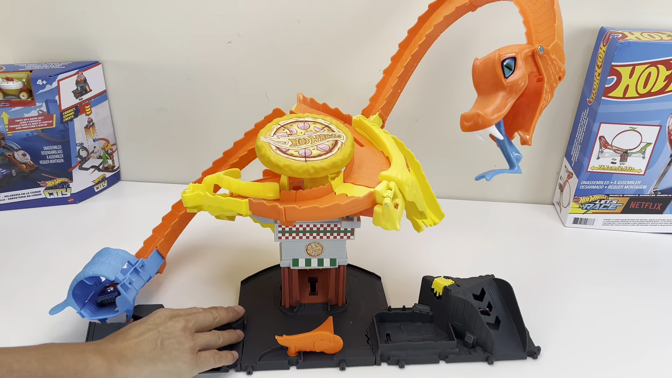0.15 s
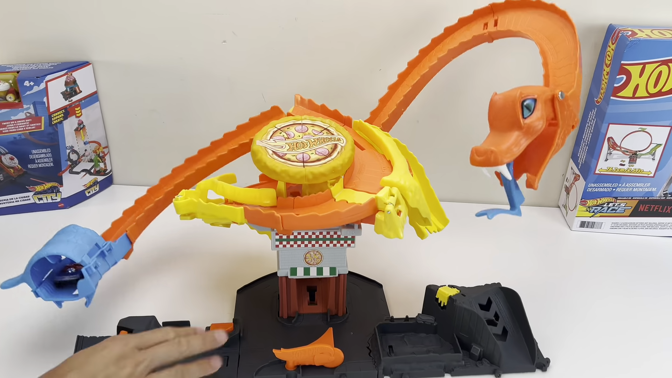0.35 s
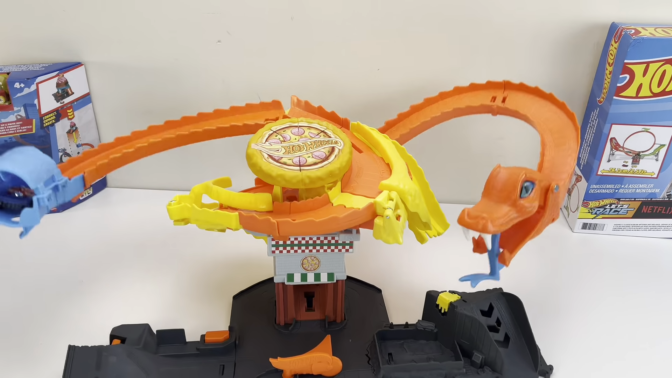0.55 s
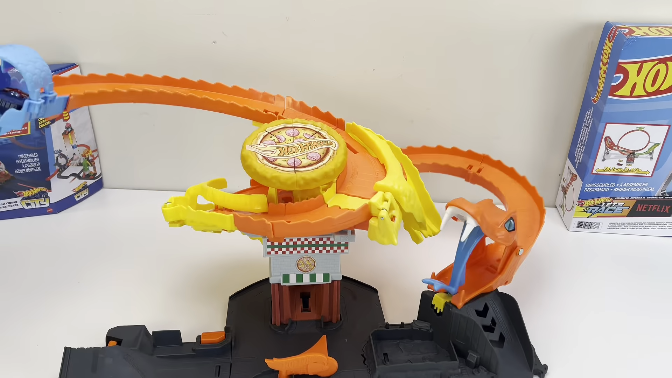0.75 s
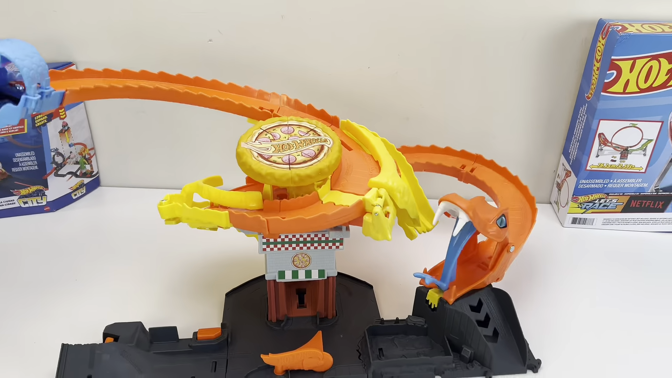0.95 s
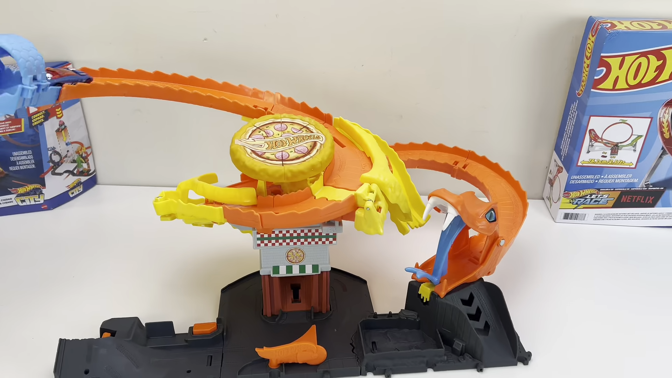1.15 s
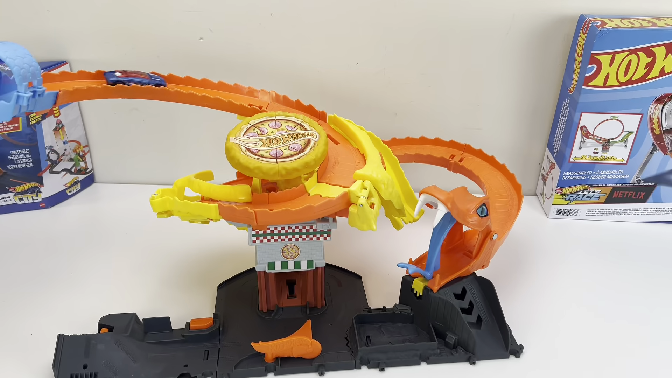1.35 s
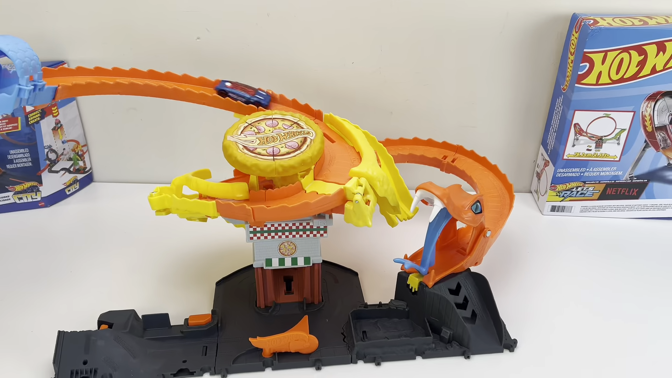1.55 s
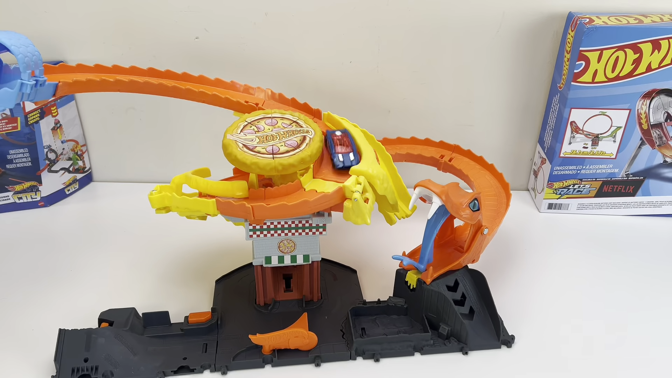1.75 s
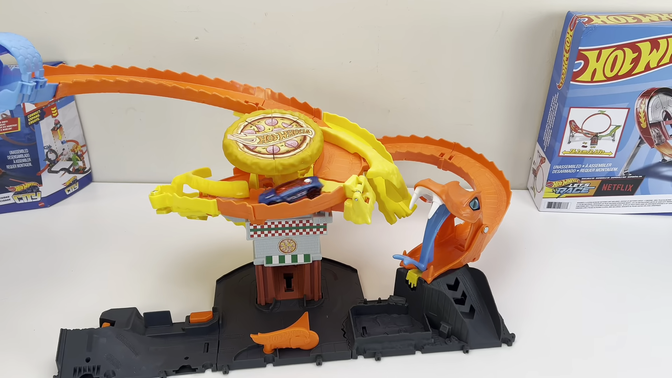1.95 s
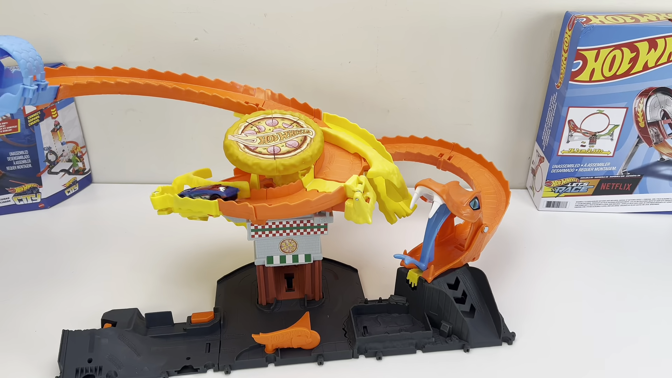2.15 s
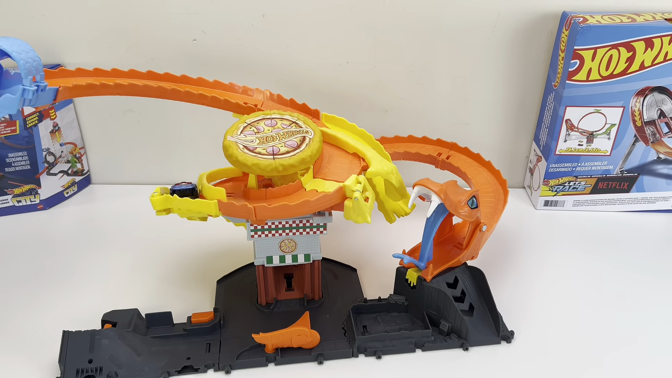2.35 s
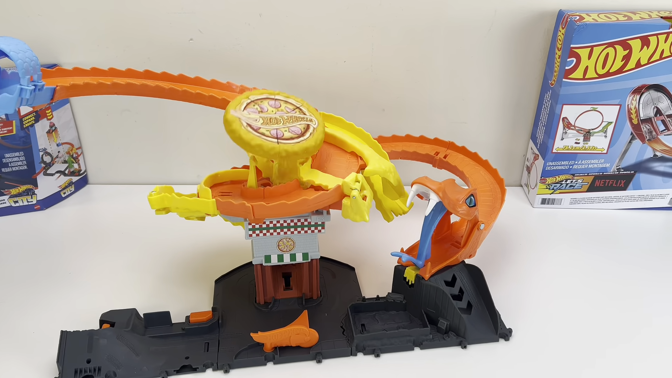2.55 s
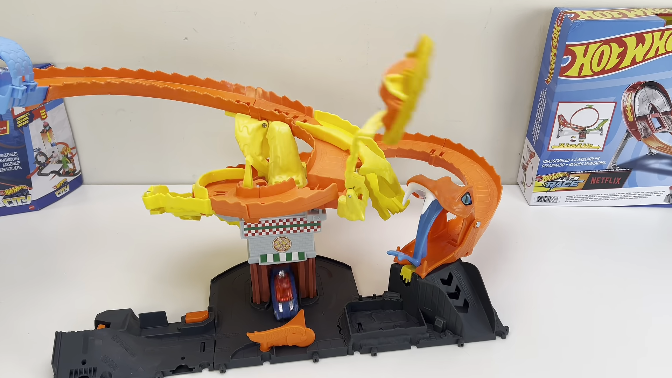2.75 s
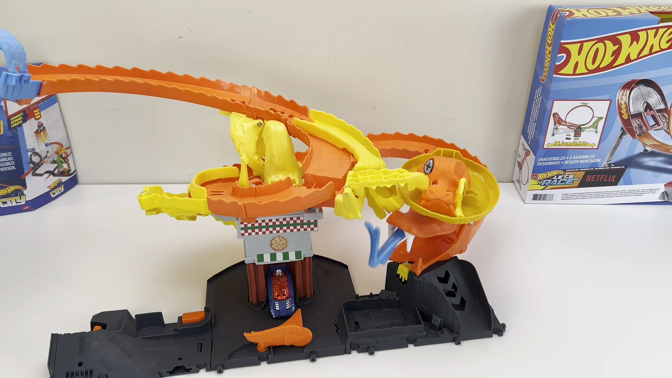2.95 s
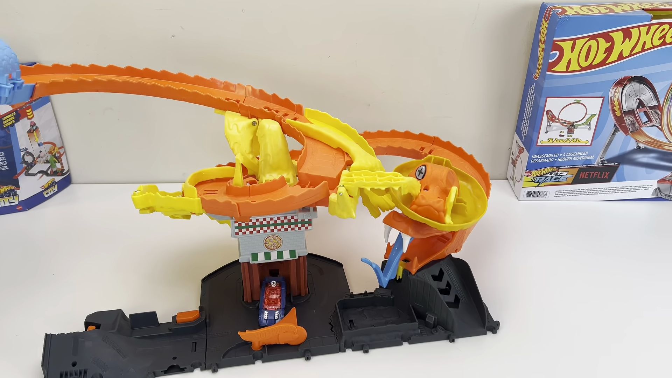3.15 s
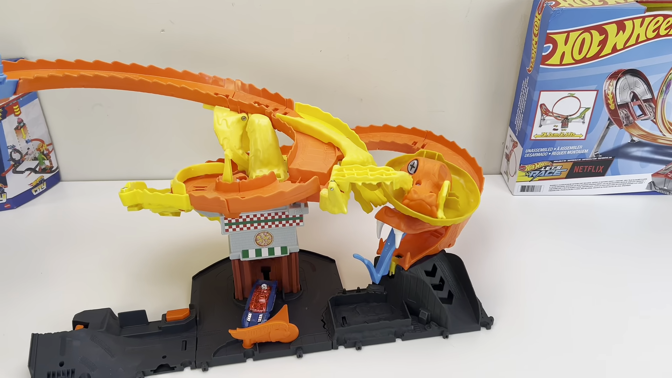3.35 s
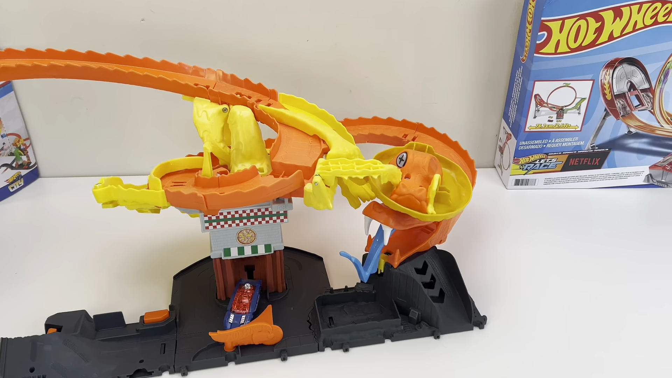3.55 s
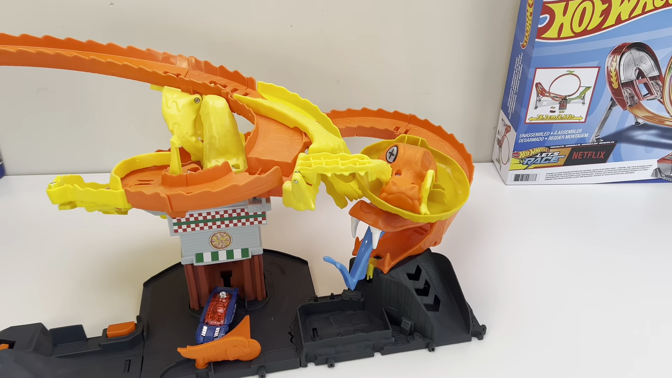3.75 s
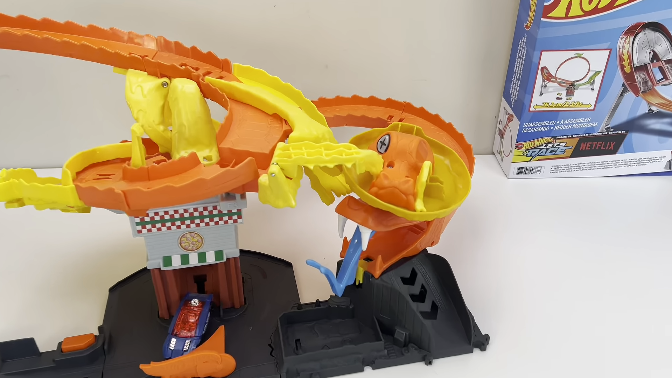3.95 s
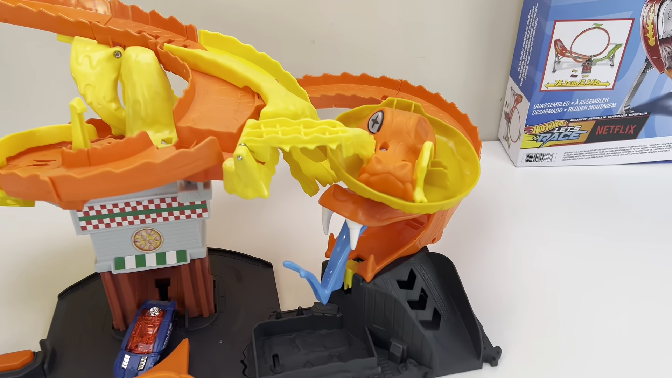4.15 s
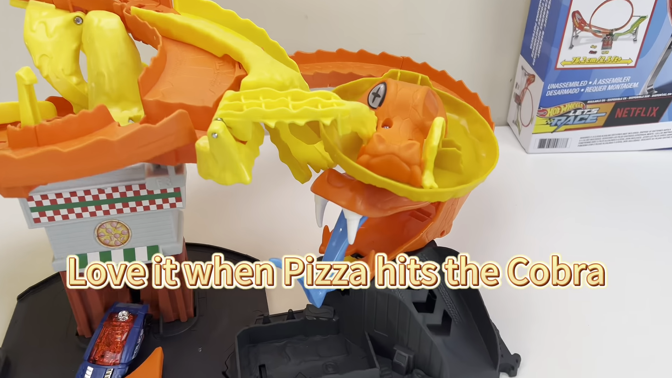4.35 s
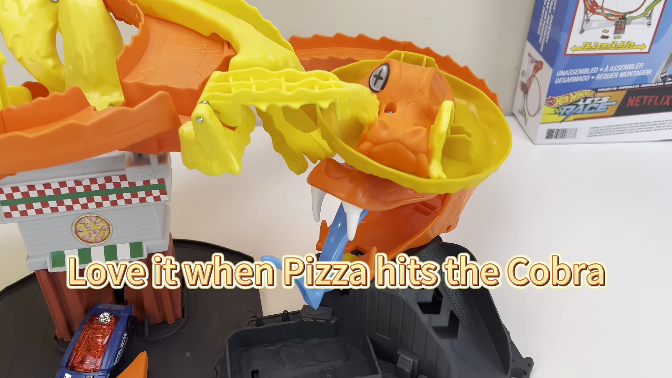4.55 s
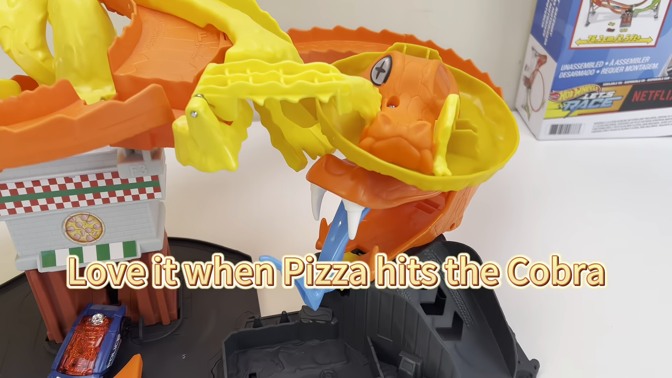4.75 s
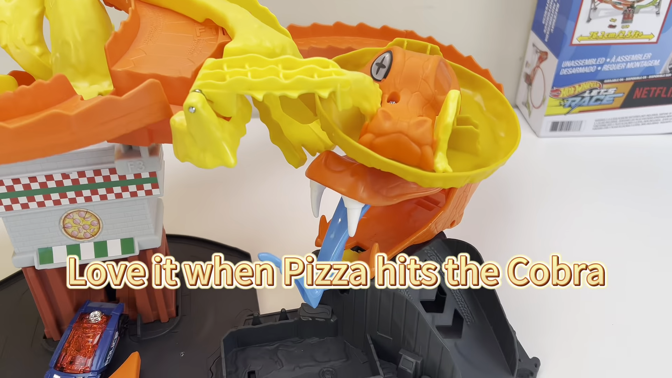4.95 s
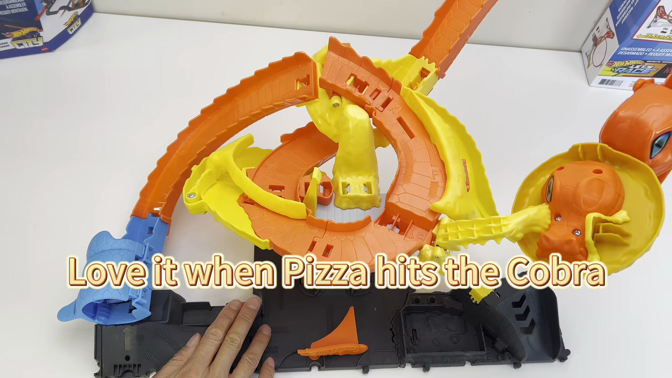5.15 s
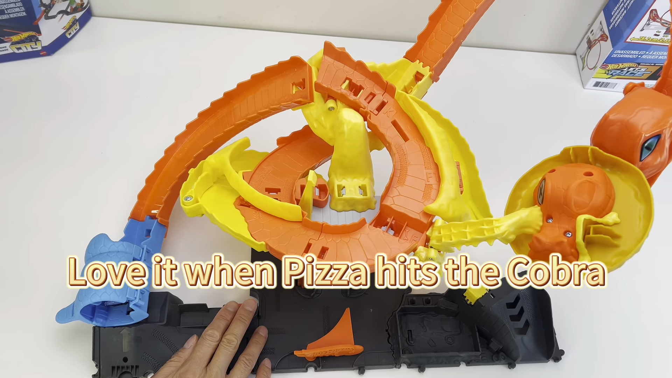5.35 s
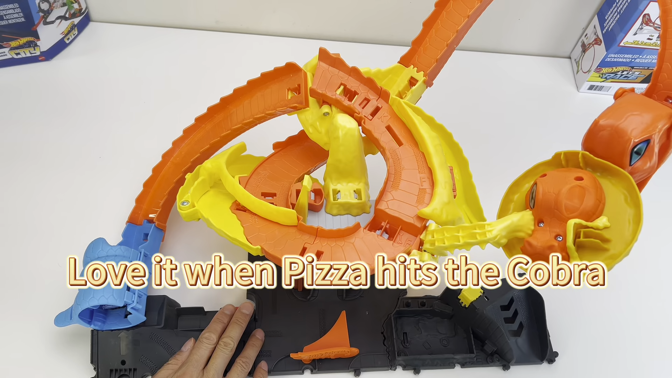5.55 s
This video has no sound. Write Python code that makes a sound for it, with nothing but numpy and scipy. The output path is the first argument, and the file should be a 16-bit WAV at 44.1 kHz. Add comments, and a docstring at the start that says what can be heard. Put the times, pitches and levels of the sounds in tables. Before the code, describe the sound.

A plastic toy track arm slams down, a small metal car rattles along it, a spring lid crashes over, then quiet room.

```python
"""Plastic see-saw track and toy car

A hand frees a latch; the arm slams down, a metal car rolls and rattles down the track and trips a spring lid
that crashes over. Then a quiet room, and light knocks with a faint rustle. Each blow is a sharp contact and a
dying noise clatter that rings banks of modes: track, panels, rails, tower, car and table top. Rolling is noise
through the same banks; wheels and axles sing on the straight. A room tail and faint air surround it."""
import sys
import numpy as np
from scipy import signal
from scipy.fft import rfft, irfft, next_fast_len
from scipy.io import wavfile
from scipy.ndimage import uniform_filter1d

SR = 44100
rng = np.random.default_rng(int(sys.argv[2]) if len(sys.argv) > 2 else 0)


def digitize_waveform(pressure):
    """Quantize a signal to 16-bit integers and store it at the path in sys.argv[1].

    Rows of a 2-D input are taken as channels; values are limited to [-1, 1].
    """
    field = np.atleast_2d(pressure).T
    bounded = np.clip(field, -1, 1)
    quanta = np.round(bounded * 32767).astype(np.int16)
    wavfile.write(sys.argv[1], SR, quanta)


N = 246078
TIME = np.arange(N) / SR
LEFT_RIGHT = np.array([[1], [-1]])


def undb(db):
    """Amplitude factor from dB."""
    return 10 ** (np.asarray(db) / 20)


def unit(x):
    """Scale to rms 1."""
    return x / np.sqrt(np.mean(x ** 2))


def colour(x, points):
    """Shape the spectrum by (frequency [Hz], gain [dB]) points, joined over log frequency."""
    size = next_fast_len(x.shape[-1])
    hz, db = np.transpose(points)
    grid_hz = np.maximum(np.arange(size // 2 + 1) * SR / size, 1)
    gain_db = np.interp(np.log(grid_hz), np.log(hz), db, left=-90)
    return irfft(rfft(x, size) * undb(gain_db), size)[..., :x.shape[-1]]


def flutter(rate_hz, depth_db):
    """Gain that wanders at about this rate, by depth_db rms."""
    hold = int(SR / rate_hz)
    steps = np.repeat(rng.standard_normal(N // hold + 1), hold)
    return undb(depth_db * unit(uniform_filter1d(steps, hold)[:N]))


# left-right correlation of each part's noise: {part: correlation [-1..1]}
CORRELATION = dict(table=.99, tower=.9, track=.75, rail=.75, panel=.75, car=.1, crack=.3, air=.8)


def pair(part, scatter_db):
    """Two channels of tiny knocks of uneven size, partly shared."""
    alike = CORRELATION[part]
    mid, side = rng.standard_normal((2, N))
    size_db = scatter_db * np.clip(rng.standard_normal(N // 40 + 1), -2, 2)
    size = np.repeat(undb(size_db), 40)[:N]
    return unit(size * (np.sqrt(1 + alike) * mid + np.sqrt(1 - alike) * side * LEFT_RIGHT))


def ring(x, modes, spot_db=2.2):
    """Bank of decaying modes, near rms 1 for rms 1 noise; the struck spot moves, so mode shares wander."""
    out, power = 0, 0
    for k, (hz, db, t60_s) in enumerate(modes):
        r = 1000 ** (-1 / (t60_s * SR))
        poles = [1, -2 * r * np.cos(2 * np.pi * hz / SR), r * r]
        drive = x * flutter(18, spot_db)
        gain = (-1) ** k * undb(db) * np.sqrt((1 - r * r) / 2)
        out = out + gain * signal.lfilter([1, 0, -1], poles, drive)
        power += undb(2 * db)
    return out / np.sqrt(power)


# air spectrum: (frequency [Hz], relative density [dB per Hz])
AIR_SPECTRUM = [(15, -50), (25, -22), (43, -6), (92, -13), (123, -9), (170, -19), (277, -22), (575, -30),
                (818, -26), (1330, -30), (1600, -36), (2500, -38), (3000, -46), (7000, -53), (16000, -60)]
AIR_DB = -63


def air():
    """Low murmur of the building and faint hiss: coloured noise, slowly wandering."""
    noise = unit(colour(pair("air", .1), AIR_SPECTRUM))
    return undb(AIR_DB) * noise * flutter(1, 0.4) * undb(.6 * LEFT_RIGHT)


# room decay: (frequency [Hz], t60 [s])
ROOM_DECAY = [(250, 0.82), (600, 0.29), (2000, 0.41), (6000, 0.36), (14000, 0.083)]
ROOM_DB = -9.5


def room(x):
    """Diffuse tail: noise that dies away band by band, less alike at the two ports as frequency rises."""
    t = TIME[:SR // 2]
    decay_hz, decay_s = np.transpose(ROOM_DECAY)
    tail = 0
    for hz in 250 * 2. ** np.arange(7):
        t60_s = np.interp(np.log(hz), np.log(decay_hz), decay_s)
        mid, side = rng.standard_normal((2, len(t)))
        noise = mid + min(hz / 3000.0, 1) * side * LEFT_RIGHT
        band = colour(noise, [(hz / 2, -40), (hz / 1.4, -3), (hz, 0), (hz * 1.4, -3), (hz * 2, -40)])
        onset = np.clip((t - .004) / 0.0045, 0, 1)
        tail = tail + band * 1000 ** (-t / t60_s) * onset
    tail = tail / np.sqrt(np.sum(tail ** 2) / 2)
    return signal.fftconvolve(x.mean(0, keepdims=True), tail, axes=1)[:, :N]


# response of each part; hard blows favour the panels over the rails:
# {part: (blow gain [dB], rattle gain [dB], then weights [dB per dB] of strength, brightness,
#         hollowness, reach, table weight)}
PARTS = dict(panel=(-1.5, -1.8, 1.054, 0.0078, -0.038, 0.0095, 0.0093),
         rail=(-6.5, -7, 0.88, 0, 0.13, 0, 0), car=(-8, -5, 0.98, 0.89, 0, 0, 0),
         track=(1.8, -.8, 1, 0, 1, 0.039, 0.021), tower=(2, -0.6, 1, 0, 0, 1, 0),
         crack=(-6.5, -7.5, 1, 1.06, 0, 0, 0), table=(-5.5, 0, 1, 0, 0, 0, 1))


def answer(part, rows):
    """Level in dB that a part takes from the five level columns."""
    return np.array(rows)[:, 1:6] @ np.array(PARTS[part][2:])


# blows, latch to hand on base plate; t60 and lean are scaled per part, middle four relative to strength:
# (time [s], strength [dB], brightness [dB], hollowness [dB], reach into tower [dB],
#  weight on table [dB], clatter t60 [s], left-right lean [dB])
BLOWS = [(0.025, -52.5, -31, 7.5, -1.5, 0, 0.13, 7.5), (0.1074, -33.0, -6, 0.0, -17, -23.5, 0.084, 9),
         (0.1388, -38.0, -6.0, 0.5, -6.5, -6.0, 0.17, 9.5),
         (0.2929, -27, -5.5, 6.0, -9.5, -14.0, 0.087, 10), (0.2994, -28.0, 1, 2.5, -11.0, -9.0, 0.091, 4.5),
         (0.5329, -52.0, 4, 2.0, 8.0, 3.5, 0.042, 8), (0.5666, -32.5, 2.5, -8.5, -15, -18.5, 0.11, 8.0),
         (0.6519, -13.5, 1.5, 4.5, -2.5, -9.5, 0.089, 5.5), (0.7332, -47, 17.0, 17, 4, 13, 0.043, 9.5),
         (0.7851, -36.0, 8.5, 4.0, -13, -21.0, 0.057, -6.0), (0.7998, -28.5, 2, -0.5, -1.5, -7, 0.18, 5.5),
         (0.8295, -26.5, -2.0, 5.0, -17, 2.5, 0.084, 6.5), (0.8703, -29.5, -11.0, -3.5, 2, -3, 0.063, 11.0),
         (0.931, -46.0, 6.0, 9.0, 0.0, 9, 0.08, 7.5), (0.9627, -41, 3, -8, -4, -10, 0.15, 14),
         (1.0969, -28.0, 7, -32, -27.0, -35, 0.045, -2.0),
         (1.2227, -38.5, 4.5, -19, -42.0, -11, 0.074, -3.0),
         (1.3382, -34.5, 0.5, -29.5, -35.5, -17, 0.15, 4.0),
         (1.3602, -36.5, 7, -29, -31.5, -29.5, 0.036, 7.0), (1.4922, -38, 6, -12, -35.5, -36.5, 0.064, 4.0),
         (1.6835, -33.0, 3.5, -7, -7, -24, 0.043, 6.0), (1.7225, -36.0, 6.0, -3.5, -6.0, -14, 0.13, 6.0),
         (1.7536, -27.0, -2.0, -16, -28, -22, 0.061, 8.0), (1.796, -32.5, 0, -12, -11.5, -18, 0.052, 13.5),
         (1.824, -31.0, -14.0, -5, -16, -14, 0.065, 7.5), (1.872, -29.5, -3, -15, -22, -24.5, 0.063, 7.0),
         (1.8901, -32.0, 4.0, -4.5, -13.0, -18.0, 0.046, 9.0),
         (1.921, -33.5, 10.5, -1.5, -3.5, -2, 0.087, 3.5), (1.9506, -24.5, 1.0, -18, -33, -13, 0.082, 7.5),
         (2.0144, -28.5, -6.0, -10.5, -11.5, -18.5, 0.061, 9.5),
         (2.0997, -40.5, 8, -7.0, -18, -6.0, 0.063, 6.0), (2.175, -42.5, -3.5, -11, -24, 0, 0.24, 6.0),
         (2.2275, -31.0, 2.0, -5, -2, -11.0, 0.065, 5.0), (2.2451, -35.0, 8.5, -3, -3, -10.0, 0.11, 4.0),
         (2.2634, -27.5, -0.5, -12, -9.5, -16, 0.073, 1.0),
         (2.299, -31.5, 1.5, -13, -21, -14.5, 0.044, 6.5), (2.3781, -44.5, 16, -15, -5.5, -4.5, 0.038, 1.0),
         (2.4276, -31.5, 12.0, 2.5, -2, -23.5, 0.029, 6.5), (2.445, -38, 9.5, -1.5, -9.5, -14, 0.069, 5.0),
         (2.4907, -35.0, -4.0, 5.0, -4.5, -9.0, 0.027, 4.5),
         (2.5349, -31.0, 7.5, -5.0, -10.0, -7.5, 0.05, 4.0),
         (2.5765, -31.5, 4.5, -6.5, -11.5, -16.5, 0.056, 4.5),
         (2.719, -38.5, 3.5, -7.5, -7.5, -12.5, 0.027, 4.5),
         (2.7833, -31.0, 8.5, 0.5, -26.0, -18.0, 0.047, 5.0),
         (2.8115, -17.5, -4.5, -0.5, -3.5, -30.5, 0.061, 7.5),
         (2.8237, -20.0, 0.5, 4.0, -7, -20.0, 0.11, 8.0), (2.8802, -6, -3, -9, -14, -23.5, 0.066, 4),
         (2.895, -24.5, 7, 3.5, -3.5, -3.5, 0.21, 4.0), (2.911, -10, 3.0, -7, -15.5, -12, 0.081, 5),
         (3.0248, -16.5, -0.5, -11.5, -8.5, -33.5, 0.052, 5.5),
         (3.0312, -28.0, 6.0, -2, -6, -4, 0.086, 5.0), (3.08, -25.0, -4.5, -10, -15, -21, 0.071, 8.0),
         (3.1276, -29.5, -7, -8, -5.5, -13.5, 0.045, 8.0), (5.4904, -63, -4.0, -12.0, 2.0, 2.5, 0.17, 6),
         (5.5605, -67.5, -3.5, -2, 13.5, 26.5, 0.061, 9.0)]
# light single ticks as the parts settle and the hand lands: columns as BLOWS
TICKS = [(1.109, -50, -8, 4, 9, -8, .008, 8), (3.325, -45, -6, -4, -8, -7, .008, -6),
         (3.516, -74, -14, 7, 9, 7, .008, 2), (3.997, -61, -26, -1, -3, -5, .008, 0),
         (5.205, -73, -6, -4, 3, 9, .008, 1), (5.277, -62, -18, -16, -14, -8, .008, 1)]
HITS = BLOWS + TICKS


def blows(part, stretch, rise_s, lean, clatter, strike_db):
    """Force on one part, left and right: a sharp first contact, then a dying clatter."""
    power, strike = np.zeros((2, 2, N))
    for row, db in zip(HITS, answer(part, HITS)):
        start = int(row[0] * SR)
        t = TIME[:min(SR // 2, N - start)]
        size = undb(db + lean * LEFT_RIGHT * row[7])
        t60_s = max(stretch * row[6], .003)
        shape = (1 - np.exp(-t / rise_s)) * 1000 ** (-t / t60_s)
        power[:, start:start + len(t)] += (size * shape) ** 2
        strike[:, start:start + 1] += size
    return clatter * np.sqrt(power) + undb(strike_db) * strike


def wobbling(curves, depth_db):
    """Strength of the chatter from (time [s], level [dB]) curves, uneven as the wheels wobble."""
    gain = 0
    for curve in curves:
        time_s, level_db = np.transpose(curve)
        gain = gain + undb(np.interp(TIME, time_s, level_db, left=-120, right=-120))
    return gain * flutter(45, depth_db) * flutter(140, 2.3) * undb(1.5 * LEFT_RIGHT)


# rattle of wheels and loose joints; middle four relative to strength:
# (time [s], strength [dB], brightness [dB], hollowness [dB], reach into tower [dB], weight on table [dB])
ROLL = [(0.65, -58, -1, .5, -6.5, -3), (0.73, -47, -3, -3, 1, -.5), (0.79, -54, 4.5, 7, 4, 0),
        (0.84, -44, 1, 3, 4.5, 7), (0.96, -52.5, -6, -0.5, -4, -5.5), (1.05, -51, -2, -11, -9, -9),
        (1.16, -54.5, 8, -2, -25, 1.5), (1.32, -54, 11, -2.5, -12, -7.5), (1.53, -43.5, 7, -8.5, -38, -21),
        (1.67, -50, 10, -13, -27, -13), (1.82, -42.5, 7.5, 1.5, -11, -10.5), (2.02, -47, 5, -4.5, -15, -2),
        (2.15, -48, 2, -6, -24, -5.5), (2.28, -49.5, 5, -7, -11.5, -2), (2.44, -48, 5, -3, -9.5, -12.5),
        (2.55, -46, 6, -3, -4.5, 1), (2.7, -46, 4.5, -5, -10, -10), (2.84, -44, 3.5, -4.5, -11, -12),
        (2.95, -37.5, -1.5, 6.5, -3.5, 12), (3.02, -53, .5, 3, -12, -8.5), (3.11, -49, -3, 0, -16, -1),
        (3.3, -70, .5, 3.5, 8, 8.5)]
# a faint rustle from 5.18 s on: columns as ROLL
FAINT_RUSTLE = [(5.18, -85, 1, -5, 1, 12), (5.39, -88, 1.92, -2, -1, 12), (5.58, -75, 0.92, -8, 10, 6)]


def rattling(part):
    """Strength of the rattle or rustle that one part feels."""
    curves = [np.c_[np.array(rows)[:, 0], answer(part, rows)] for rows in (ROLL, FAINT_RUSTLE)]
    return undb(PARTS[part][1]) * wobbling(curves, 3.3)


def shaken(part, scatter_db=3.1, **contact):
    """Blows and rolling together drive one part through the same noise."""
    grit = pair(part, scatter_db)
    hits = blows(part, clatter=grit, **contact)
    return undb(PARTS[part][0]) * hits + grit * rattling(part)


# table top: (frequency [Hz], relative level [dB], t60 [s])
TABLE_MODES = [(57.6, -14, 0.25), (81, -9, .1), (121.66, 1.5, .22), (205.2, -14, 0.05), (263, -13.5, .06)]
SHUDDER_DB, SHUDDER_RISE_S, SHUDDER_STRETCH = -7, 0.038, 2.2


def table_top():
    """Each blow is one soft push and a shudder that swells after it; the rattle comes through as rumble."""
    grit = pair("table", .1)
    push = blows("table", 0.27, 0.0013, .12, clatter=0.97, strike_db=-39)
    shudder = blows("table", SHUDDER_STRETCH, SHUDDER_RISE_S, .15, clatter=grit, strike_db=-60)
    rumble = grit * rattling("table")
    drive = undb(PARTS["table"][0]) * push + undb(SHUDDER_DB) * shudder + rumble
    return ring(drive, TABLE_MODES, 0.3)


# tower: (frequency [Hz], relative level [dB], t60 [s])
TOWER_MODES = [(255, -7, 0.038), (380, -2, 0.053), (456, -4, 0.053), (514, -3, 0.074), (582.7, -3, 0.023),
               (676, -3, 0.027)]


def tower():
    """Low modes of the tower, driven by what reaches into it."""
    return ring(shaken("tower", stretch=1.0, rise_s=0.0013, lean=0.38, strike_db=21), TOWER_MODES)


# panels: (frequency [Hz], relative level [dB], t60 [s])
PANEL_MODES = [(2288, -3, 0.017), (2453, -1, .035), (2660, -0.5, .02), (2973, -4.5, 0.018),
               (3214, -7.5, .015)]


def panel():
    """Short bright modes of the plastic panels."""
    return ring(shaken("panel", stretch=.9, rise_s=0.0011, lean=0.35, strike_db=18), PANEL_MODES)


# rails: (frequency [Hz], relative level [dB], t60 [s])
RAIL_MODES = [(1580, -0.05, 0.014), (1744, 0.65, .025), (1878, -2.3, 0.023), (2110, -4.5, 0.057)]


def rail():
    """Rail modes between those of the track and the panels."""
    return ring(shaken("rail", stretch=1.0, rise_s=0.0023, lean=0.33, strike_db=11), RAIL_MODES)


# hollow track: (frequency [Hz], relative level [dB], t60 [s])
TRACK_MODES = [(805.4, -9.5, 0.037), (888.8, -9, 0.074), (993, -5.5, 0.035), (1115, -5, 0.023),
               (1246, -6, 0.05), (1384, -8, 0.019)]


def track():
    """Middle modes of the hollow track, driven by strength plus hollowness."""
    return ring(shaken("track", stretch=0.94, rise_s=0.00087, lean=0.45, strike_db=19.4), TRACK_MODES)


# contact crack: (frequency [Hz], relative density [dB per Hz])
CRACK_SPECTRUM = [(200, -8), (1000, -8), (3000, 1.5), (6000, -1), (8500, -3), (12000, -5), (14500, -6),
                  (16000, -21.5)]


def crack():
    """Broadband crack of the contacts: the driving noise coloured, without modes."""
    filter_rms = np.std(colour(rng.standard_normal(N), CRACK_SPECTRUM))
    force = shaken("crack", stretch=0.91, rise_s=0.00037, lean=0.21, strike_db=6.8)
    return colour(force, CRACK_SPECTRUM) * undb(4.5) / filter_rms


def swell(start_s, full_s, fading_s, gone_s, first_db, full_db):
    """Rise, hold, release as (time [s], level [dB]) rows."""
    return [(start_s, first_db), (full_s, full_db), (fading_s, full_db), (gone_s, full_db - 18)]


# wheels: (frequency [Hz], relative level [dB], t60 [s])
WHEEL_MODES = [(2420, -11.5, .03), (2763, 1, 0.037), (3040, -2.5, .04), (3200, -7, .03)]
# (start [s], full [s], fading [s], gone [s], first level [dB], full level [dB])
WHEELS_SING = (1.11, 1.42, 1.7, 1.74, -50.5, -38.5)


def wheels():
    """Wheels sing on the long straight: noise rings their modes; it swells, holds and dies."""
    return ring(pair("panel", 3.4) * wobbling([swell(*WHEELS_SING)], 2.2), WHEEL_MODES)


# axles: (frequency [Hz], relative level [dB], t60 [s])
AXLE_MODES = [(4720, -5, 0.056), (5010, 1.5, .04), (5300, -5, .02)]
# (start [s], full [s], fading [s], gone [s], first level [dB], full level [dB])
AXLES_SING = (1.33, 1.43, 1.81, 1.86, -54, -40)


def axles():
    """Axles sing higher, in a shorter swell."""
    return ring(pair("car", 2.8) * wobbling([swell(*AXLES_SING)], 3.5), AXLE_MODES)


# metal car: (frequency [Hz], relative level [dB], t60 [s])
CAR_MODES = [(3600, -5, .008), (3950, -4, .01), (4300, -4, .008), (4750, -2, .012), (5100, 0, .012),
             (5400, -3, .01), (5900, -5, .008), (6600, -8, .006)]


def car():
    """Very short high modes of the metal car, driven by strength and brightness."""
    return ring(shaken("car", stretch=1.0, rise_s=0.00033, lean=1.0, strike_db=11), CAR_MODES)


def toy():
    """All parts answer the same blows and rolling, each in its own modes; wheels and axles sing on top."""
    structure = table_top() + tower() + panel() + rail() + track()
    return structure + crack() + wheels() + axles() + car()


def scene():
    """Toy, its room tail and the air."""
    near = toy()
    return air() + undb(ROOM_DB) * room(near) + near


BASS_HZ, TOP_HZ = 46.7, 16500
PORT_HZ, PORT_LAG_S, ONE_WAVE_SHARE = 6260, 0.0001502, .85


def record(dry):
    """Above PORT_HZ both ports carry nearly one wave, left later; bass roll-off, soft peaks, cut top."""
    size = next_fast_len(N)
    both = rfft(dry, size)
    hz = np.arange(size // 2 + 1) * SR / size
    share = ONE_WAVE_SHARE / (1 + (PORT_HZ / np.maximum(hz, 1)) ** 12)
    lag = np.exp(-2j * np.pi * hz * PORT_LAG_S)
    one_wave = both[1] * np.array([lag, np.ones(len(hz))])
    out = irfft(both + share * (one_wave - both), size)[:, :N]
    out = signal.sosfilt(signal.butter(2, BASS_HZ, "high", fs=SR, output="sos"), out)
    out = .93 * np.tanh(out / .93)
    return signal.sosfilt(signal.ellip(14, .2, 120, TOP_HZ, fs=SR, output="sos"), out)


dry = scene()
out = record(dry)
digitize_waveform(out)
```